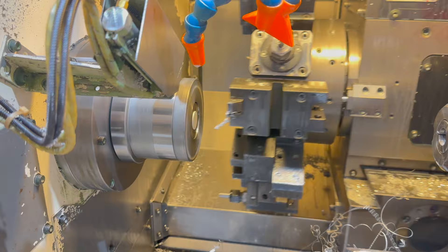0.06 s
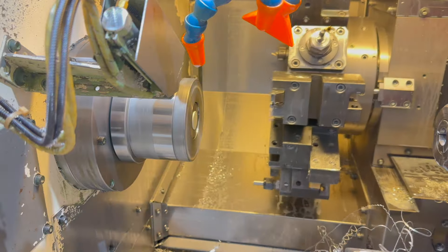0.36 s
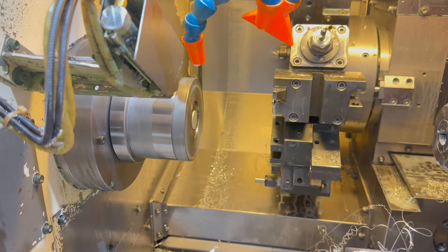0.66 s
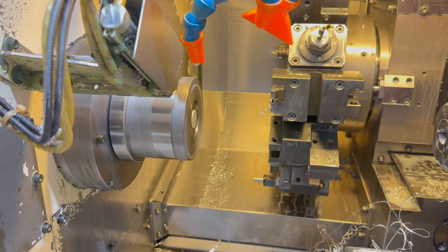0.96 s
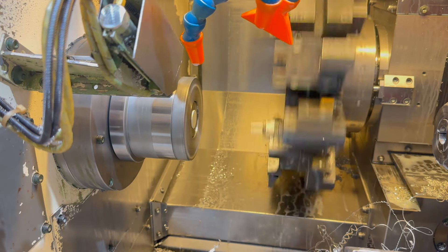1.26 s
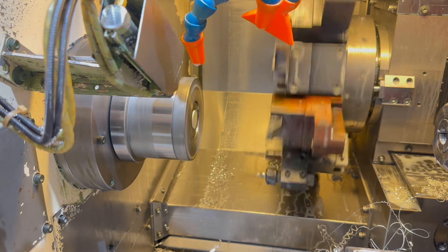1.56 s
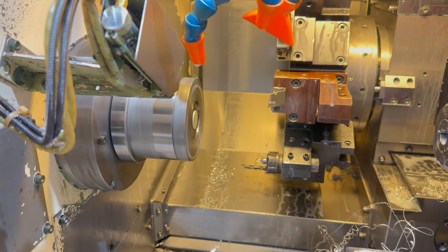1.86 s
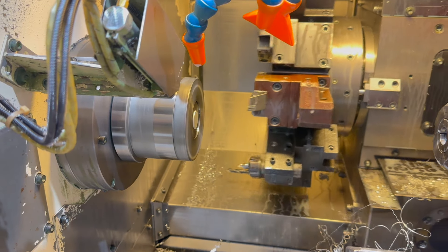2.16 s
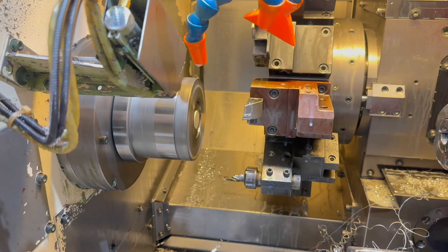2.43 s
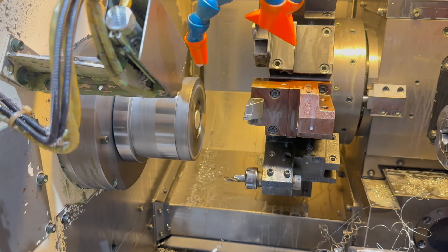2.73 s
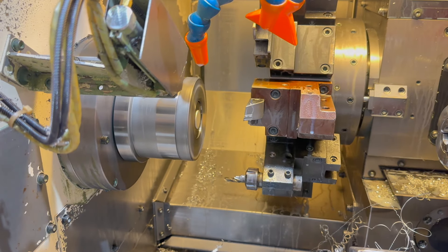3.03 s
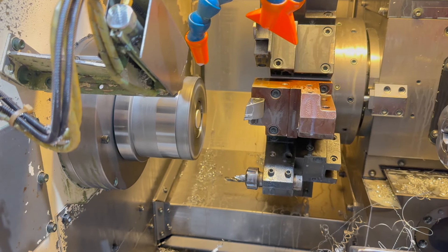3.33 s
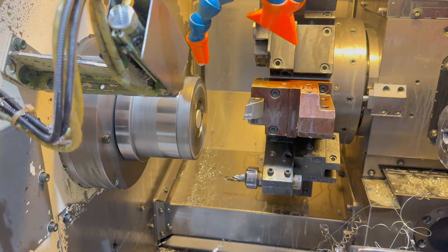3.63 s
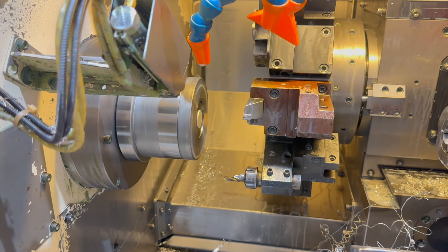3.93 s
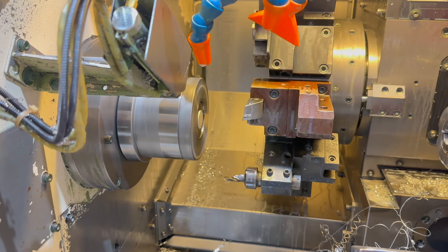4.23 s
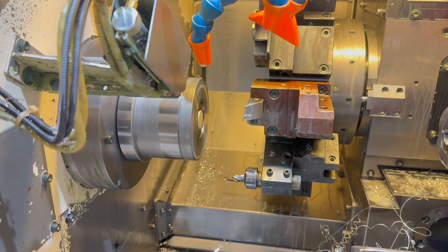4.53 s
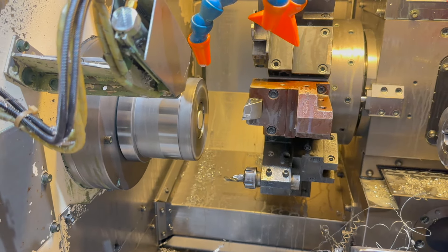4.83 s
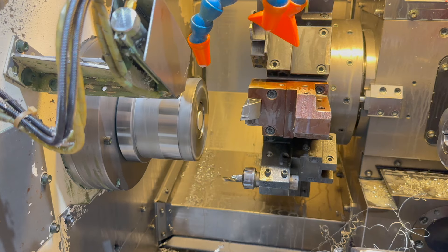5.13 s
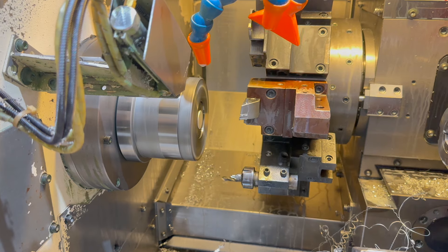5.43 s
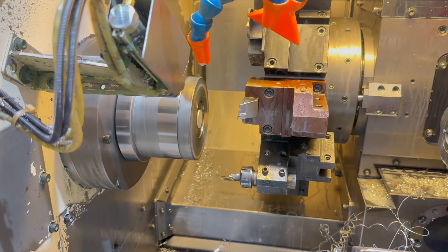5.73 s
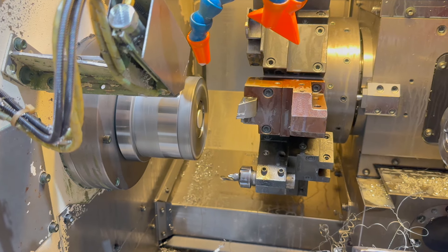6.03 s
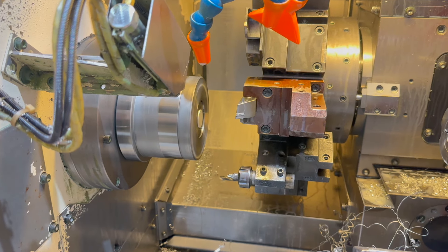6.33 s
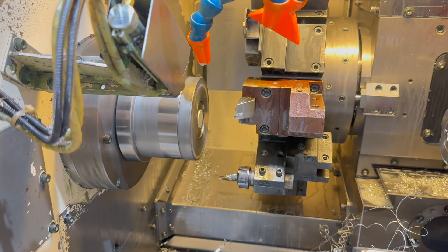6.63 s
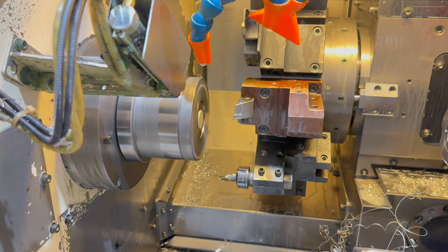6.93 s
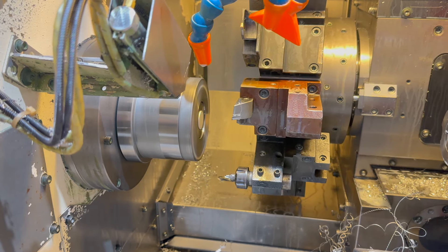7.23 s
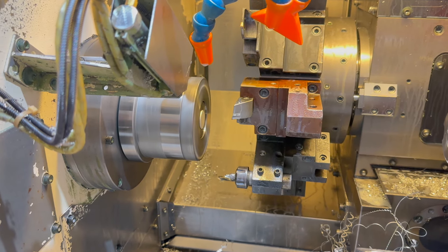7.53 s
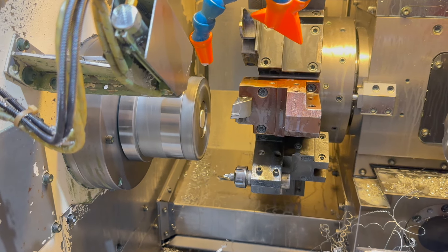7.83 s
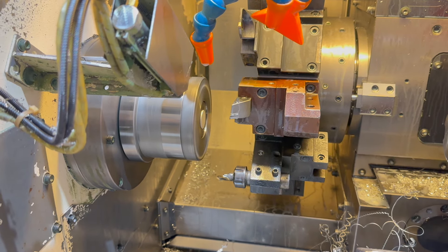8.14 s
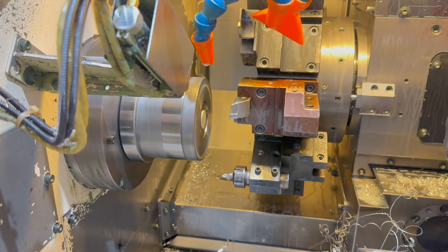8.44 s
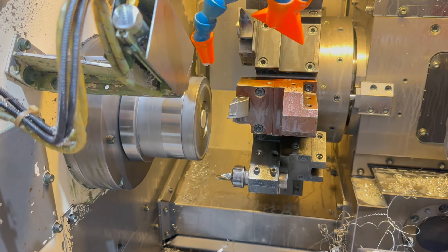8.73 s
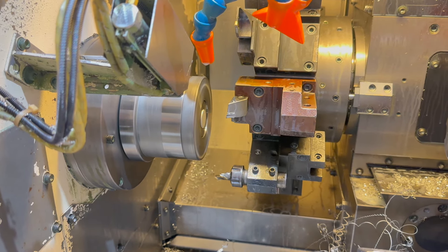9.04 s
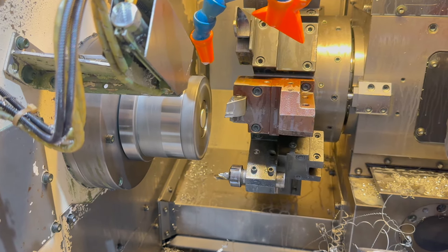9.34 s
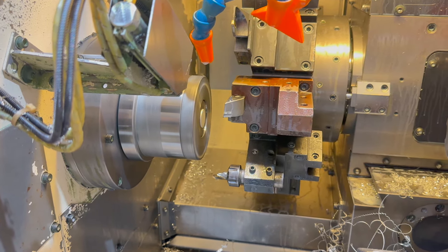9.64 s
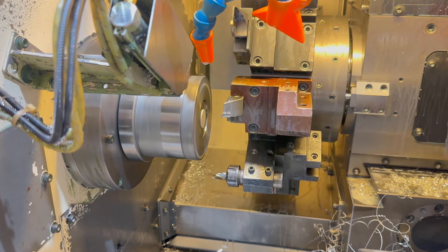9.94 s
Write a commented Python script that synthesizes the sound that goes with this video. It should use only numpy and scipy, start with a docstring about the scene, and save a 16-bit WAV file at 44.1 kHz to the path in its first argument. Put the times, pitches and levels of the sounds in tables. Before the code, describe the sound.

Close up inside a CNC lathe's steel enclosure, pumps hum and fans sing under a high hiss. A slide rushes briefly, then the tool turret unclamps with a thud, whirs round on its gears with valve hiss and a short squeal, and clunks into its lock. The slide makes another short move, and the machine idles on with thin, wavering whines.

```python
"""CNC lathe changing tools

Workshop, two microphones close up, looking into the steel enclosure. The lathe idles: pump motors throb,
fans sing, a servo whistles and a high hiss lies over it all. The slide runs back on its ball screw, the
turret unclamps with a thud and a hiss from its valve, whirs round on its gears with a short friction
squeal and clunks into its lock. Then the slide moves in again."""
import sys
import numpy as np
from scipy import signal
from scipy.fft import rfft, irfft, next_fast_len
from scipy.io import wavfile
from scipy.ndimage import uniform_filter1d

SR = 44100
rng = np.random.default_rng(int(sys.argv[2]) if len(sys.argv) > 2 else 0)


def put_to_file(sound):
    """Save the sound as 16-bit audio at rate SR, in the file named by the first command-line argument."""
    columns = np.atleast_2d(sound).T  # one column per channel
    safe = np.clip(columns, -1, 1)
    whole_steps = np.round(safe * 32767)
    wavfile.write(sys.argv[1], SR, whole_steps.astype(np.int16))


N = 440118
TIME = np.arange(N) / SR
SIZE = next_fast_len(N, True)
BINS = np.fft.rfftfreq(SIZE, 1 / SR)
BEARING_TURN_HZ = 25.5

# noise of the turret's gears and panels: (frequency [Hz], relative level [dB])
TURRET_COLOUR = [(35, -27), (60, -18), (90, 6), (130, -9), (250, -5), (350, -11), (480, -15.5),
                 (600, -14.5), (900, -21), (1500, -57)]


def amp(db):
    """Decibels to gain."""
    return 10 ** (np.asarray(db) / 20)


def unit(x):
    """Scales to rms 1."""
    return x / np.sqrt(np.mean(abs(x) ** 2) + 1e-20)


def spectrum(points):
    """A table's value at every bin, interpolated over log frequency."""
    hz, value = np.transpose(points)
    return np.interp(np.log(BINS + 1), np.log(hz + 1), value)


def follow(rows, column=1):
    """One column of a timed table at every sample."""
    rows = np.array(rows)
    return np.interp(TIME, rows[:, 0], rows[:, column])


def drift(rate_hz):
    """Random wander of rms 1, mostly slower than rate_hz."""
    t = np.arange(4096) / 400
    rolloff = 1 + (np.fft.rfftfreq(len(t), t[1]) / rate_hz) ** 2
    slow = irfft(rfft(rng.standard_normal(len(t))) / rolloff)
    return np.interp(TIME, t, unit(slow))


def spell(start, length, db, rise_s, fall_s):
    """Gain that rises, holds and dies away."""
    rise = np.clip((TIME - start) / rise_s, 0, 1)
    return amp(db) * rise * np.exp(-np.clip((TIME - start - length) / fall_s, 0, 20))


def spells(rows, rise_s, fall_s):
    """Gain of a source that sounds once for each row."""
    return sum(spell(*row[:3], rise_s, fall_s) for row in rows)


def swells(rows, rest_db):
    """Gain of bell-shaped swells over a resting level."""
    power = sum(amp(db) ** 2 * np.exp2(-2 * np.minimum((2 * (TIME - centre) / width) ** 2, 20))
                for centre, width, db in rows)
    return np.sqrt(amp(rest_db) ** 2 + power)


def noise(colour, lift_db=0):
    """Coloured noise at the two microphones: alike in the bass, less so in the middle."""
    likeness = [(100, 1), (300, .95), (600, .75), (1000, .4), (1500, .25), (2500, .45), (5200, .35),
                (6300, .65), (7700, .45), (8500, .85), (16000, .9)]  # between the microphones: (frequency [Hz], coherence [0-1])
    balance = [(100, 1.1), (500, 7.5), (1100, 1), (1550, -3.5), (2100, 3), (3000, 0), (5500, 1.5),
               (7300, 2), (8500, -1)]  # (frequency [Hz], left over right [dB])
    lead = [(100, 0), (500, -.1), (1000, -.4), (1350, -1.9), (1650, -4.2), (2000, -6.2), (2800, -5),
            (4000, -5.9), (7000, -5.3), (9000, -6.5), (11000, -9.4), (12300, -10), (14000, -12.5),
            (15700, -13.6)]  # (frequency [Hz], left phase lead [rad])
    left, other = rfft(rng.standard_normal((2, SIZE)))
    same = spectrum(likeness)
    right = (same * left + np.sqrt(1 - same ** 2) * other) * np.exp(-1j * spectrum(lead))
    lean = amp(spectrum(balance) / 2)
    pair = np.array([left * lean, right / lean]) * amp(spectrum(colour) + lift_db)
    return unit(irfft(pair, SIZE)[:, :N])


def place(phase, lean_db, lead):
    """A sine of rms 1 at the microphones, the left louder by lean_db and ahead by lead radians."""
    left, right = amp([lean_db / 2, -lean_db / 2])
    return np.array([left * np.sin(phase), right * np.sin(phase - lead)]) * 2 / np.hypot(left, right)


def tone(hz, width, lean_db, lead, waver_hz=5):
    """A tone whose pitch wanders by about width Hz."""
    return place(2 * np.pi * np.cumsum(hz + width * drift(waver_hz)) / SR, lean_db, lead)


def resonance(hz, width_hz):
    """Noise in one narrow resonance at a fixed or moving pitch, stronger on the left."""
    rolloff = 1 + (np.fft.fftfreq(SIZE, 1 / SR) / width_hz) ** 2
    band = np.fft.ifft(np.fft.fft(rng.standard_normal((2, SIZE))) / rolloff)[:, :N]
    left, other = (band * np.exp(2j * np.pi * np.cumsum(np.full(N, hz)) / SR)).real
    return unit(np.array([amp(9.5) * left, 0.26 * left + 2.0 * other]))


def motors(settle_db=8.0, fade_db=4.5):
    """Motors, pumps and fans: the two lowest tones beat in a settling throb, the high ones fade at times."""
    # running tones: (pitch [Hz], level [dB], width [Hz], left over right [dB], left lead [rad])
    tones = [(58.2, -39.3, 0.1, 0.4, -0.1), (67.6, -41.4, 0.1, -0.1, 0.0), (153.8, -45.8, 0.3, 0.8, 0.0),
             (174.8, -40.8, 0.1, 0.8, -0.2), (198.5, -42.4, 0.1, 1.4, 0.1), (228.5, -47.6, 0.1, 3.6, -0.0),
             (253.4, -43.4, 0.1, 2.5, -0.1), (270.2, -45.0, 0.1, 4.7, 0.4), (287.2, -40.7, 0.1, -1.9, -0.5),
             (342.5, -49.8, 0.1, -3.4, -0.3), (358.8, -49.8, 0.1, 3.4, -0.7),
             (410.0, -38.7, 0.1, -0.8, 0.2), (422.3, -50.3, 0.1, -0.4, 0.1), (511.4, -50.7, 0.1, 5.0, 0.7),
             (595.2, -29.7, 0.1, 5.1, -0.3), (675.6, -49.7, 0.1, 0.0, -0.9), (711.8, -33.8, 0.1, 1.9, -1.2),
             (738.0, -47.2, 0.1, -4.8, -0.7), (1248.8, -44.0, 0.4, 6.0, -1.9),
             (1281.2, -45.0, 0.3, 6.0, -0.2), (1365.2, -46.4, 0.5, -4.9, -2.8), (1372, -49, 0.5, -2, -2),
             (1701.0, -46.5, 0.9, -0.7, 1.6), (1844.3, -54.0, 1.1, 2.6, 0.1),
             (1902.5, -51.5, 1.1, -2.6, 0.7), (2019.1, -47.9, 1.2, 6.0, -0.6),
             (2067.9, -48.9, 1.1, 5.7, -0.2), (2119.3, -49.4, 0.9, 6.0, 0.6),
             (2461.2, -56.1, 1.3, 0.6, 1.1), (2498.0, -54.6, 1.3, 4.8, 1.3), (2745.3, -55.0, 1.5, 3.3, 1.1),
             (2955, -56.5, 1.5, 2, 1), (2981.2, -55.7, 2.7, 1.8, 0.9), (3151.8, -51.4, 1.5, 4.0, 2.8),
             (3208, -55, 3, 1, 1), (3325, -55, 3, 1, 1), (3403.3, -55, 2.5, -0.7, 1.0),
             (3431.9, -53.9, 1.4, 0.3, 2.0), (3717.3, -57.0, 1.7, 3.7, 0.6),
             (3805.7, -56.8, 1.4, 1.5, -0.1), (4118.4, -56.3, 1.6, -2.2, 0.4), (4804.8, -56, 4, 0.3, -1.2),
             (5510.1, -58.9, 0.9, 5.6, 0.6), (5723.0, -57, 0.1, 4.9, 0.3), (6256.6, -53.5, 0.1, 3.9, 1.4),
             (8223.7, -55.4, 11.6, 0.0, -0.2), (8905.5, -59.3, 3.4, 0.1, -0.1)]
    out = 0
    for hz, db, width, lean_db, lead in tones:
        if hz < 100:
            db += settle_db * (.5 - TIME / TIME[-1])
        if hz > 1000:
            db -= fade_db * drift(3.3) ** 2
        out += amp(db) * tone(hz, width, lean_db, lead)
    return out


def hum_and_fans(idle_hum_db=-44, waver_db=3.0):
    """Mains hum that grows under load, and two fans that swell and fade."""
    loads = [(.35, 0.9, -36), (1.7, 0.1, -25.5), (2.25, 1.08, -36.5), (4.15, 0.36, -36.5)]  # hum under load: (start [s], length [s], level [dB])
    # each fan's swells: (centre [s], width [s], level [dB])
    low_swells = [(.45, 0.99, -33), (4.34, .3, -41), (5.7, 0.33, -40), (7.25, .3, -42), (8.3, 0.83, -40.5),
                  (9.6, 0.78, -43)]
    high_swells = [(.1, 0.54, -36), (.7, .25, -38), (2.65, 0.95, -30.5), (3.7, 0.49, -39),
                   (4.7, 0.7, -34.5), (5.92, 0.74, -30), (6.65, 0.91, -37), (7.9, 0.88, -33.5),
                   (9.75, 0.63, -29.5)]
    hum = tone(117.2, .2, 1.5, 0)
    low_fan = swells(low_swells, rest_db=-53.5) * tone(811.3, .5, -1.9, .7)
    high_fan = swells(high_swells, rest_db=-43) * tone(862.3, .5, 3.4, .4)
    idle = amp(idle_hum_db + waver_db * np.tanh(drift(1.3)))
    return np.hypot(spells(loads, rise_s=0.098, fall_s=0.11), idle) * hum + low_fan + high_fan


def servo_whistle(hz=5991, rest_db=-53, sag=.6, pause_s=0.03):
    """A servo holding position sings faintly and flares in spurts; its flutter sags either side of each."""
    flares = [(2.3, .05, -46), (2.46, 0.072, -41), (3.51, .06, -46), (3.62, .09, -45.5), (3.84, .07, -46),
              (4.38, .08, -47), (4.67, .04, -44), (4.79, .06, -42), (5.0, .1, -40.5), (5.21, .06, -45),
              (5.43, .08, -42.5), (5.73, .1, -45), (5.82, .07, -39), (5.98, .07, -40), (6.1, .05, -44),
              (6.25, 0.054, -40), (6.35, .08, -44), (6.46, .045, -42), (6.71, 0.093, -37), (6.9, .08, -39),
              (7.11, .07, -40), (7.34, 0.13, -38), (7.51, .08, -41.5), (7.67, .05, -40), (7.78, .08, -44),
              (7.87, 0.049, -36), (7.98, 0.081, -37.5), (8.25, .035, -42.5), (8.4, 0.091, -35),
              (8.53, .07, -43), (8.72, 0.065, -41.5), (8.84, .09, -42), (8.94, .08, -45), (9.11, .04, -46),
              (9.53, .08, -43)]  # spurts: (centre [s], width [s], level [dB])
    flutter_levels = [(0, -54), (4, -56.5), (6.5, -51), (9, -53), (9.98, -55)]  # random flutter: (time [s], level [dB])
    spurts = np.zeros(N)
    flutter = amp(follow(flutter_levels)) * abs(drift(6.6))
    for centre, width, db in flares:
        near = abs(TIME - centre) < 2 * width
        away = abs(TIME[near] - centre)
        spurts[near] += amp(db) * np.exp2(-(2 * away / width) ** 2.8)
        flutter[near] *= 1 - sag * np.exp(-((away - width / 2 - pause_s) / pause_s) ** 2)
    throb = 1 + .25 * np.sin(2 * np.pi * BEARING_TURN_HZ * TIME)
    shiver = amp(drift(25))
    return np.hypot(spurts, amp(rest_db) + flutter) * throb * shiver * tone(hz, 3.12, 1.6, 0.79)


def whines(warble_hz=14, throb=0.21, flutter_db=3.5):
    """A bearing warbles and throbs as it turns, a panel rings and thin whines come and go."""
    # bearing whine and panel ring: (time [s], level [dB])
    bearing_levels = [(0, -46), (2.5, -46), (3.2, -50), (5.5, -47.5), (6.7, -44.5), (9.2, -42), (9.98, -47)]
    panel_levels = [(0, -47), (2.0, -43), (2.4, -50), (3.5, -55), (8.2, -48.5), (8.9, -44), (9.98, -40)]
    # passing whines: (start [s], length [s], level [dB], pitch [Hz], width [Hz], left over right [dB])
    passing = [(-.1, 0.44, -40, 2105, 1.3, 1), (-.1, 0.44, -43, 1190, 3, 0), (-.1, .5, -49, 1900, 1.8, 0),
               (2.197, 0.38, -42, 2115, 5.8, 4), (2.2, 1.8, -54, 4805, 6.5, 0),
               (2.3, 1.6, -51, 3174, 3.5, 8), (2.4, 2, -53.5, 3806, 5.1, 1), (2.605, 0.68, -43, 1283, 4, 4),
               (3.5, 0.22, -46.5, 10000, 23, 0), (4.0, 3.3, -43.5, 1283, 1.85, 10),
               (5.353, 0.33, -45, 1703, 1.6, -2), (5.65, 1.4, -52, 5723, 1.1, 4),
               (6.55, .13, -47, 6257, 3, 4), (6.3, 3.25, -44, 1241, 5.8, 18),
               (6.45, 3.4, -53, 4650, 8.9, -2), (7.2, 1.8, -48.5, 2565, 4.6, -5),
               (7.3, 0.91, -47, 1703, 1.2, 0), (7.35, 0.76, -47, 4650, 19, -2), (8.6, 1.1, -52, 5723, 1, 4),
               (9.62, .36, -46, 3410, 19, 0)]
    turn = np.sin(2 * np.pi * BEARING_TURN_HZ * TIME)
    bearing = (1 + throb * turn) * tone(6864 + warble_hz * turn, 12.8, 22, 1.0, waver_hz=30.2)
    panel = resonance(2095, width_hz=52)
    out = amp(follow(bearing_levels)) * bearing + amp(follow(panel_levels)) * panel
    for start, length, db, hz, width, lean_db in passing:
        gain = spell(start, length, db, rise_s=0.088, fall_s=0.057)
        flutter = amp(flutter_db * np.tanh(drift(12)))
        out += gain * flutter * tone(hz, width, lean_db, 1.0, waver_hz=30.6)
    return out


def rumble_and_air():
    """Motor rumble, and cooling air that rings the steel enclosure."""
    # rumble and moving air: (frequency [Hz], relative level [dB])
    rumble_colour = [(20, -30), (40, -9), (50, 0), (85, 3), (110, -4), (180, -1.5), (280, -4.5),
                     (380, -12.5), (800, -57)]
    air_colour = [(150, -4.5), (450, 0.5), (900, 4), (1050, 1), (1330, 3.5), (1430, 2.5), (1560, 1),
                  (1780, -2), (2100, 0.5), (2400, -3.5), (3500, -6.5), (4000, -7.5), (5200, -7.5),
                  (5800, -9), (6700, -4.5), (7300, -10), (7900, -8), (9500, -12), (11000, -43),
                  (16000, -44)]
    enclosure = [(920, 40, 2.5), (1178, 20, 4), (1585, 60, 2.5), (1648, 12, 5.5), (2045, 12, 6),
                 (2535, 9, 7), (2595, 10, 4), (2650, 25, 3), (2917, 14, 5.5), (3300, 12, 4.5),
                 (3383, 12, 6), (4238, 12, 5), (4516, 9, 8.5), (5130, 25, 5), (5490, 15, 8),
                 (6282, 14, 5.5), (6513, 14, 4.5), (6626, 20, 4.5), (7116, 40, 4), (7520, 90, 5),
                 (7760, 180, -4), (9580, 150, 5), (9965, 40, 8)]  # resonances: (frequency [Hz], width [Hz], lift [dB])
    rumble = amp(-35.5) * noise(rumble_colour)
    ringing_db = sum(db / (1 + (2 * (BINS - hz) / width) ** 2) for hz, width, db in enclosure)
    return rumble + amp(-31.5 + .3 * drift(3)) * noise(air_colour, ringing_db)


def high_hiss(shaft_hz=58.2):
    """A high sizzle that pulses once per turn of the motor shaft."""
    colour = [(8000, -28), (10000, -21), (11300, -22), (12600, -12.5), (14000, -10.5), (14700, -7),
              (14890, -1), (15020, -4), (15300, 0), (15650, 0), (16000, -3), (16500, -60)]  # drive hiss: (frequency [Hz], relative level [dB])
    pulse = 1 + .18 * np.sin(2 * np.pi * shaft_hz * TIME)
    return amp(-35.7 + .45 * drift(30)) * pulse * noise(colour)


def axis_whine(hz=2563, rest_db=-51):
    """The axis motor sings on one pitch, faintly at rest and firmly while it drives."""
    moves = [(-.1, 0.096, -38), (.35, 0.32, -38.5)]  # motor driving: (start [s], length [s], level [dB])
    gain = np.hypot(amp(rest_db), spells(moves, rise_s=0.095, fall_s=0.036))
    return gain * tone(hz, 5.97, 2.5, 0.55, waver_hz=12)


def slide(rush_db=-1, sing_db=-4):
    """Balls rush along the screw, singing higher the faster the slide travels."""
    moves = [(0, .35, -29.5, 1001, 2165), (2.04, .17, -31, 2363, 1855)]  # travel: (start [s], length [s], level [dB], first pitch [Hz], last pitch [Hz])
    colour = [(300, -27), (800, 3), (1250, 4), (2200, -0.5), (2800, -5), (4000, -5), (8500, -9),
              (11000, -36)]  # rushing balls: (frequency [Hz], relative level [dB])
    hz = follow([point for start, length, _, first, last in moves
                 for point in ((start, first), (start + length, last))])
    rush = amp(rush_db) * noise(colour) + amp(sing_db) * resonance(hz, width_hz=290)
    grain = amp(drift(90))
    return spells(moves, rise_s=0.033, fall_s=0.084) * grain * rush


def coupling_knocks(rattle_db=-11, rattle_t60=0.19, weight_hz=170):
    """The turret coupling rings the frame and rattles its panels; cushioned blows favour the low modes."""
    blows = [(0.68, -15, 900, -9), (0.695, -6.5, 190, 12), (0.729, -15.5, 200, 2), (.753, -16, 280, -6),
             (0.773, -23, 220, -10), (.803, -21, 120, 2), (0.825, -19, 120, 13), (1.086, -17, 130, 24),
             (1.776, -17, 299, -1), (1.797, -14, 160, 9), (1.928, -6.5, 750, -8), (1.951, -5.5, 230, 6),
             (1.989, -17, 280, -12), (2.023, -19, 300, -20), (2.052, -21, 300, -10)]  # (time [s], level [dB], brightness [Hz], low-mode lift [dB])
    frame_modes = [(69.9, -4.5, 0.64), (91, 5, 0.25), (119, -5, 0.25), (151, -2.5, 0.26), (184, 2.5, 0.18),
                   (210.7, 4.5, 0.25), (239, 3, 0.24), (329, 1.5, 0.076), (368, 3.5, 0.11),
                   (459, 3.5, 0.12), (506, -14, .1), (600, 6.5, 0.11), (660, -12, 0.097)]  # (frequency [Hz], level [dB], time to fall 60 dB [s])
    out, t = np.zeros((2, N)), np.arange(SR // 2) / SR
    panels = noise(TURRET_COLOUR)
    attack = 1 - np.exp(-t / 0.0004)
    for time, db, bright_hz, weight_db in blows:
        ring = 0
        for k, (hz, mode_db, t60) in enumerate(frame_modes):
            decay = amp(mode_db + weight_db / (1 + (hz / weight_hz) ** 4) - 60 * t / t60)
            cushion = np.hypot(1, (hz / bright_hz) ** 2)
            ring += (-1) ** k * decay / cushion * np.sin(2 * np.pi * hz * t)
        start = round(time * SR)
        span = slice(start, start + len(t))
        rattle = amp(rattle_db - 60 * t / rattle_t60) * panels[:, span]
        out[:, span] += amp(db) * (ring / abs(ring).max() + rattle) * attack
    return out


def clamp_valve(ring_db=-13):
    """Fluid hisses through the clamp valve in puffs, with a thin ring."""
    puffs = [(0.97, 0.21, -31.5, 0.038, 2), (1.2, 0.11, -32, .06, -3), (1.582, 0.1, -27.5, .06, 1),
             (1.85, 0.27, -40, .03, -4)]  # (start [s], length [s], level [dB], rise [s], tilt [dB/octave])
    colour = [(1500, 6), (3500, 8.5), (6000, 6.5), (8000, 6.5), (10000, 3), (12000, -40), (16000, 4)]  # fluid hiss: (frequency [Hz], relative level [dB])
    ring = amp(ring_db) * resonance(6864, width_hz=70)
    octaves = np.log2(np.maximum(BINS, 1500))
    return sum(spell(start, length, db, rise_s, fall_s=0.17) * (noise(colour, tilt * octaves) + ring)
               for start, length, db, rise_s, tilt in puffs)


def disc_squeal(core_db=-3.5, rasp_db=-2, scrape_db=-5):
    """The turret disc rubs as it turns: a wavering core inside a rasp, and a scrape as it breaks loose."""
    friction = [(.997, -39, 3220), (1.025, -28.5, 3150), (1.06, -24, 3100), (1.11, -22.5, 3070),
                (1.16, -28.5, 3020), (1.215, -28.5, 3100), (1.25, -25.5, 3170), (1.315, -34, 3110),
                (1.37, -30, 3090), (1.43, -39, 3140), (1.49, -38, 3160), (1.57, -56, 3170)]  # squeal: (time [s], level [dB], pitch [Hz])
    start, end = friction[0][0], friction[-1][0]
    hz = follow(friction, column=2)
    core = amp(core_db) * tone(hz, 64, 1.5, 0.95, waver_hz=120.3)
    scrape = spell(start, 0, scrape_db, rise_s=.01, fall_s=0.17) * resonance(3400, width_hz=200)
    rasp = amp(rasp_db) * resonance(hz, width_hz=150)
    rubbing = (TIME > start) & (TIME < end)
    return rubbing * amp(follow(friction)) * (core + rasp + scrape)


def gear_teeth(order, phase, load, roughness=.13, slack=.42):
    """One multiple of the mesh tone; slack teeth chatter more under light load."""
    chatter = drift(60)
    chatter = unit(chatter - uniform_filter1d(chatter, size=1500))  # quick flutter only
    return (1 + (roughness * order + slack * (1 - load)) * chatter) * place(order * phase, .3, .3)


def turret_gears(mesh_db=-28, housing_hz=299.4, housing_width_hz=6.4, ring_s=0.0078, shaft_hz=20.43):
    """The gear mesh follows the speed, surges with its shaft, booms in its housing and rattles on braking."""
    speed = [(1.06, 90.1), (1.22, 279.3), (1.28, 281.4), (1.361, 295), (1.499, 293.2), (1.549, 241.7),
             (1.61, 187), (1.665, 141.5), (1.74, 81)]  # run-up, cruise and braking: (time [s], mesh pitch [Hz])
    orders = [(1.152, -19.5), (1.87, -21.5), (2.002, -8.5), (2.8, -30), (3.002, -22)]  # overtones: (pitch [multiple of the mesh], level [dB])
    brake = (1.575, 0.042, -30.5)  # the teeth bear harder: (start [s], length [s], level [dB])
    rattle_colour = [(90, -20), (160, 0), (300, 6), (420, -17), (900, -38)]  # braking teeth: (frequency [Hz], relative level [dB])
    start, end = speed[0][0], speed[-1][0]
    hz = follow(speed)
    phase = 2 * np.pi * np.cumsum(hz * (1 + .009 * drift(65))) / SR
    shaft = 2 * np.pi * shaft_hz * (TIME - 1.408)  # a surge peaks at 1.408 s

    pole = np.exp(-1 / (ring_s * SR))
    housing = amp(-12) / np.hypot(1, (hz - housing_hz) / housing_width_hz)
    boom = signal.lfilter([1 - pole], [1, -pole], housing)
    turning = spell(start, end - start, 0, rise_s=0.19, fall_s=0.011)
    braking = spell(*brake, rise_s=0.016, fall_s=0.044)
    force = turning * (amp(mesh_db) * hz / housing_hz + boom + braking)
    load = force / force.max()
    bite = np.minimum(load, np.interp(TIME - .035, TIME, load))  # sustained load brings out overtones

    mesh = gear_teeth(1, phase, load) + amp(-9) * place(phase - shaft, .3, .32)
    overtones = sum(amp(db) * bite ** (0.89 * max(order - 1.5, 0)) * gear_teeth(order, phase, load)
                    for order, db in orders)
    surge = 1 + 0.23 * (1 - load) * np.cos(shaft)
    rasp = 1 - 0.46 * np.cos(2 * shaft)
    rattle = amp(-2) * braking * abs(drift(60)) * noise(rattle_colour)
    rumble = amp(-12) * force.max() * load ** 0.32 * noise(TURRET_COLOUR)
    return force * surge * (mesh + rasp * overtones) + rattle + rumble


def scene():
    """The idling machine and one tool change, close up."""
    idle = motors() + hum_and_fans() + servo_whistle() + whines() + rumble_and_air() + high_hiss()
    return idle + axis_whine() + slide() + clamp_valve() + turret_gears() + disc_squeal() + coupling_knocks()


def record(dry):
    """The recorder's band limits: steep cuts under the bass and at the very top."""
    low_cut_hz, high_cut_hz = 44, 15780
    bass_cut = np.hypot(1, (low_cut_hz / (BINS + 1)) ** 8)
    dry = irfft(rfft(dry, SIZE) / bass_cut, SIZE)[:, :N]
    lowpass = signal.firwin(1023, high_cut_hz, window=("kaiser", 9), fs=SR)
    return signal.oaconvolve(dry, lowpass[None], "same")


dry = scene()
out = record(dry)
put_to_file(out)
```